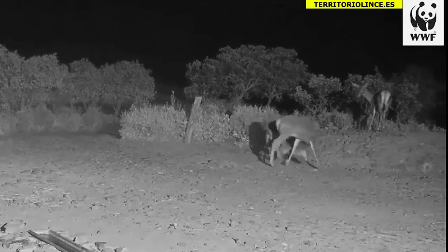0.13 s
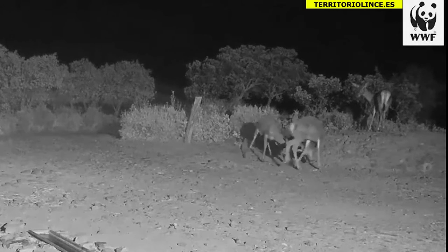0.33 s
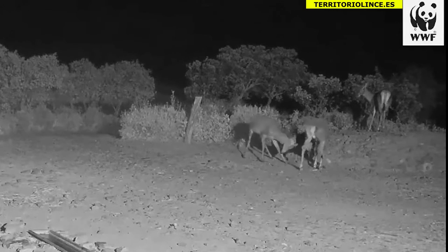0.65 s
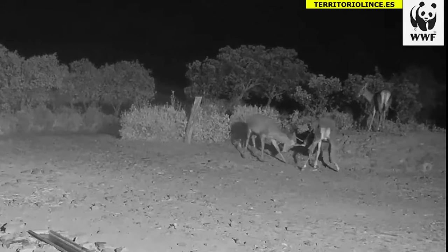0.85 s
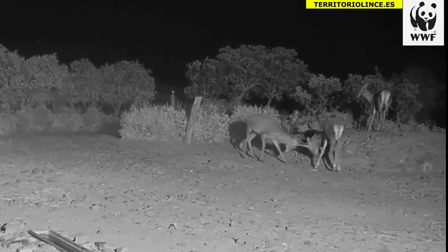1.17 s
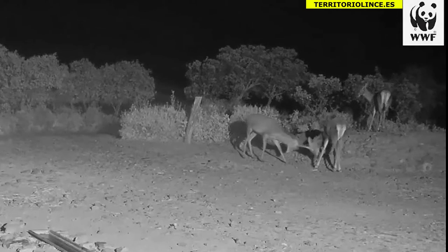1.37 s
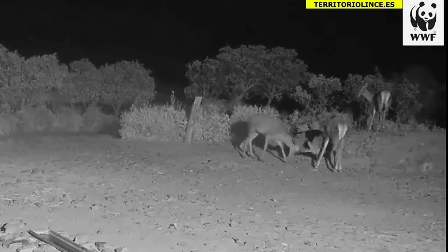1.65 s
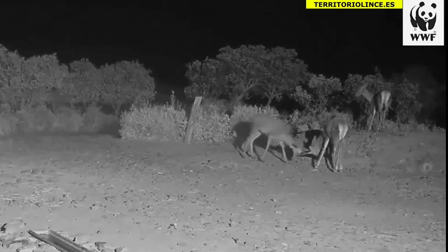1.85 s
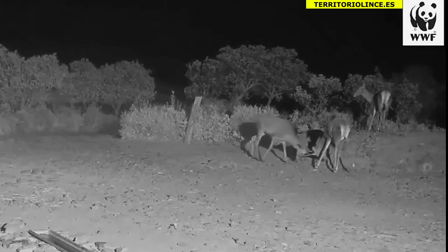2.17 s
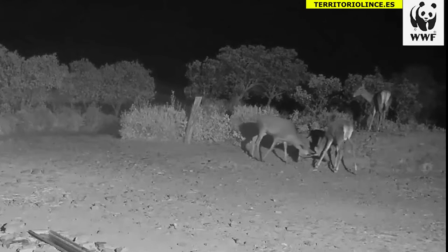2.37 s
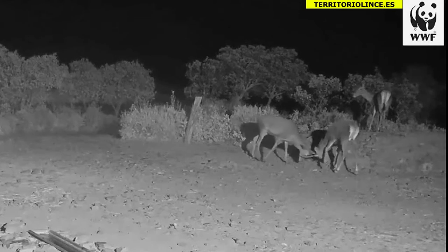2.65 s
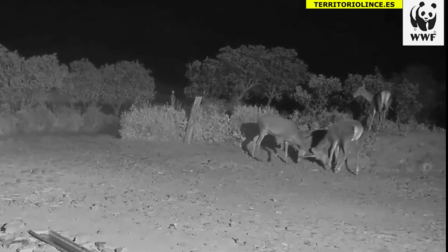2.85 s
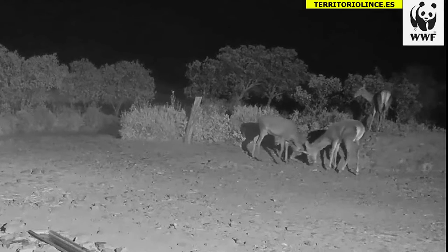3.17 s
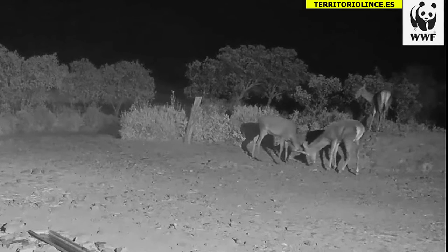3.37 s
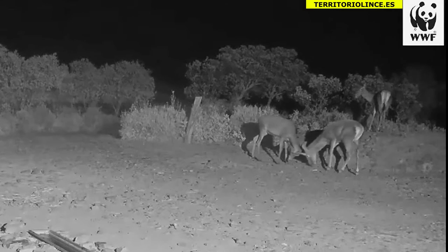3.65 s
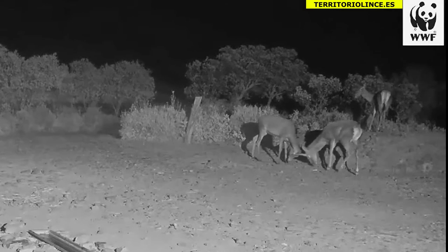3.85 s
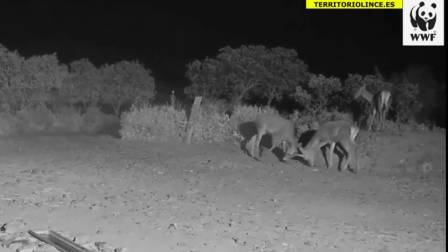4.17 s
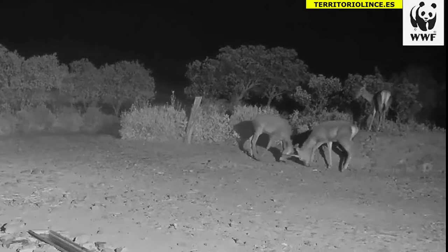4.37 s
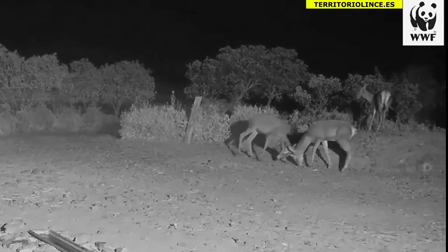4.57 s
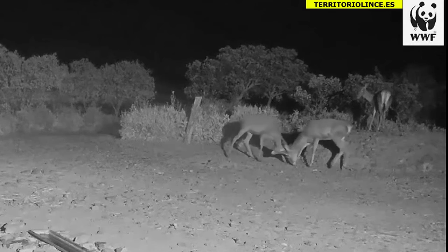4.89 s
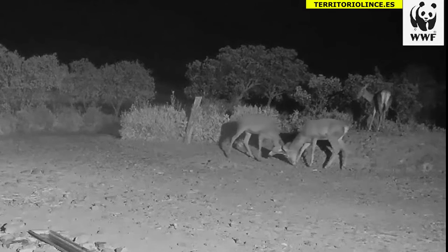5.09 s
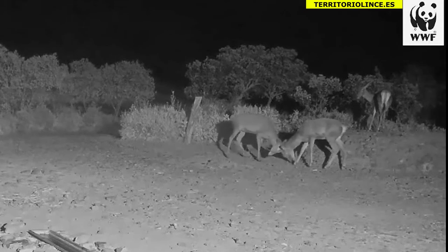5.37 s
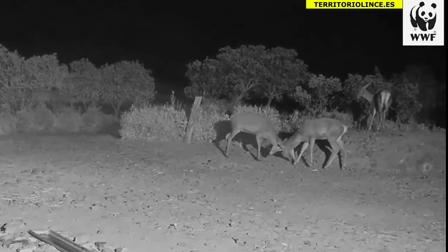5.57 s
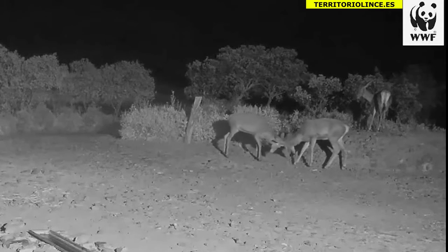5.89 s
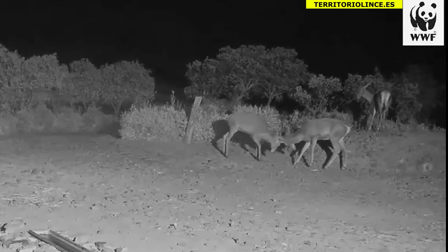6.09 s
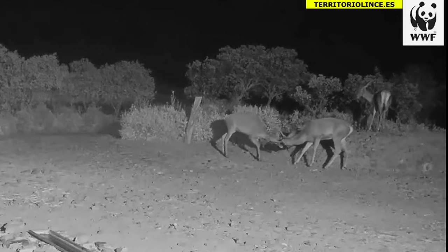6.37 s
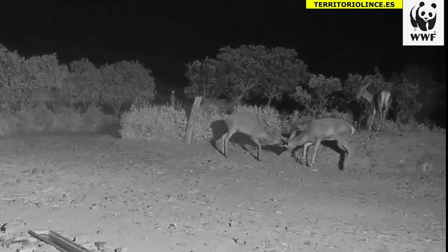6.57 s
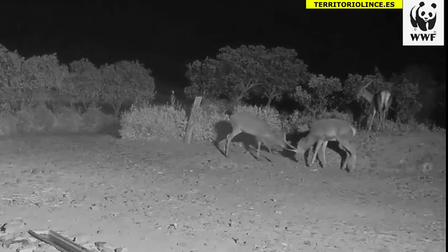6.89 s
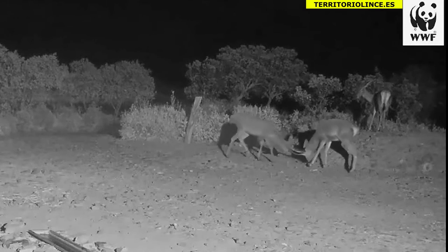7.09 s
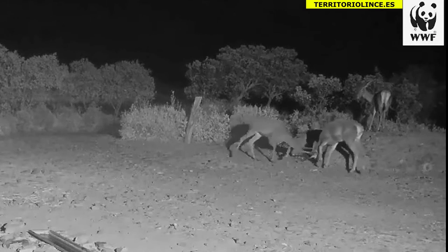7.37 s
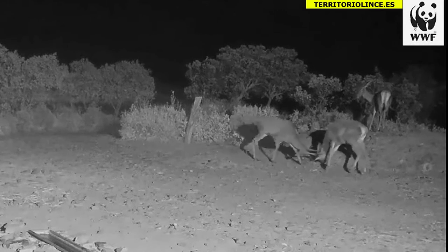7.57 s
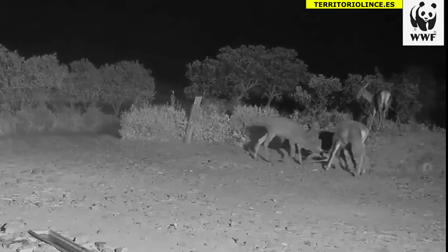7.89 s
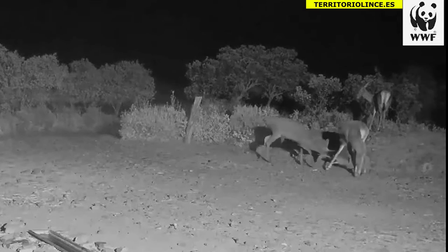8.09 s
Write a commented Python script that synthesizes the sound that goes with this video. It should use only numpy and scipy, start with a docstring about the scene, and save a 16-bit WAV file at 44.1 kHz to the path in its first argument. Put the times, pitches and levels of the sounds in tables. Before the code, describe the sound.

Two stags spar in an open clearing at night. A rapid flurry of dry antler clicks and short scrapes opens, then mostly hiss for a couple of seconds. Scattered clacks return with hoof thuds and dirt scuffles, building to one loudest sharp crack near seven seconds, then busy rattling and a faint low grunt. A small single microphone at some distance, mono, with steady noise and little bass.

```python
"""An open clearing at night: two stags lock antlers some way from a single small microphone.
Tines click (dry pulses plus ringing bone modes) and grate (dense contacts on the same modes).
Hooves thud (short low sine pulses) and scuffle (dense knocks on dirt modes).
One stag grunts (harmonics of a sagging pitch); steady coloured noise hisses over it all."""
import sys
import numpy as np
from scipy import signal
from scipy.fft import rfft, irfft
from scipy.io import wavfile

SR = 44100
rng = np.random.default_rng(int(sys.argv[2]) if len(sys.argv) > 2 else 0)


def generate_wav(sig):
    """Save sig (samples, or channels by samples) to the path in sys.argv[1] as 16-bit PCM at SR."""
    pcm = np.round(np.clip(np.atleast_2d(sig).T, -1, 1) * 32767).astype(np.int16)
    wavfile.write(sys.argv[1], SR, pcm)


N = 363384

# All source levels are ahead of the microphone filters.
# Tine-on-tine blows: (time [s], peak level [dB], centre [Hz], rise of the crack [cycles])
# A short rise is dry and broad.
BLOWS = [(.0794, -20, 2300, .5), (.0822, -20, 3700, .6), (.0865, -27, 2350, 1.0), (.3112, -18.5, 3900, .5),
         (.3131, -20, 4400, 1.2), (.3175, -18, 1450, .6), (.3255, -25, 2100, .5), (.3655, -15, 2100, .45),
         (.3693, -23, 2400, .5), (.5001, -15.5, 3300, .35), (.5029, -19, 3000, .7), (.5218, -18, 2900, .35),
         (.5231, -22, 3700, .6), (.529, -20, 3600, .5), (.5317, -20, 3250, 1.5), (.6048, -14.5, 2400, .45),
         (.688, -20, 3950, 1.8), (.689, -25, 1400, .6), (.6906, -25, 2000, .4), (.6933, -21, 1500, .4),
         (.9943, -21, 2500, .5), (.9955, -24, 4200, 1.0), (1.148, -29, 1300, .6), (3.046, -26, 1300, .7),
         (3.302, -29, 1250, .8), (4.0187, -22, 3500, .45), (4.0335, -25, 3500, .5), (4.0445, -19, 4000, .6),
         (4.0487, -22, 3900, .9), (4.0537, -15.5, 2300, .35), (4.1525, -23, 3000, .4),
         (4.181, -29, 2000, .6), (4.2185, -24, 4500, .4), (4.5457, -17, 3700, 1.0),
         (4.5477, -18.5, 3950, 1.1), (4.826, -28, 1000, .8), (4.834, -24, 1000, 1.5),
         (4.839, -23, 1150, .7), (4.8419, -23, 1100, .8), (4.995, -24, 4300, 1.5), (5.113, -30, 1090, .8),
         (5.146, -29, 1200, .8), (5.4295, -24, 1400, .35), (5.4398, -22, 1200, .4), (5.4435, -28, 5800, .8),
         (5.6448, -25, 3400, .5), (6.2907, -24, 4500, .4), (6.357, -30, 1090, .8), (6.383, -30, 1090, .8),
         (6.4026, -25, 3750, .7), (6.4071, -23, 4200, .4), (6.42, -18, 3500, 1.3), (6.4271, -16, 3200, 1.4),
         (6.4428, -24, 4500, .4), (6.4476, -25, 4050, .8), (6.4629, -22, 5200, 1.2),
         (6.465, -25, 3900, 1.5), (6.4713, -20, 5100, 1.0), (6.484, -27, 1400, .8), (6.4876, -24, 3300, .7),
         (6.51, -25, 3700, .5), (6.5236, -17, 4100, 1.3), (6.533, -18, 4300, 1.6), (6.824, -27, 6000, .6),
         (6.9465, -13, 4300, 1.1), (6.9477, -8.5, 5200, 1.2), (6.9497, -19, 3500, 1.2),
         (6.9519, -20, 5500, 1.0), (6.9528, -13.5, 4400, 1.0), (7.1444, -19, 4000, .4),
         (7.2871, -21.5, 3200, .5), (7.3305, -24, 2200, .4), (7.3374, -21, 3400, .4),
         (7.3385, -26, 1450, .8), (7.381, -28, 6500, .6), (7.417, -23, 6000, .4), (7.461, -22, 2000, .4),
         (7.7012, -23, 2700, .6), (7.7032, -20, 3400, .5), (7.7045, -23, 5000, .4), (7.7064, -24, 3300, .5),
         (7.893, -24, 3800, .9), (7.907, -25, 6500, .9), (7.9712, -24, 4300, .6), (7.9846, -20, 4700, 1.0),
         (7.9873, -20, 4800, 1.6), (7.9971, -21, 4600, .4), (7.9988, -22, 2200, .35),
         (8.0275, -25, 4500, .4), (8.0701, -19, 2800, .35), (8.0717, -18, 6600, .45),
         (8.1554, -20, 2200, .4), (8.1573, -20, 4700, .9), (8.1582, -23, 6800, .8), (8.159, -23, 1400, .6),
         (8.1611, -25, 2500, .4), (8.2144, -26, 4000, .5), (8.2159, -24, 4200, .5)]
# Antler bone modes: (frequency [Hz], relative level [dB], 60 dB decay [s])
ANTLER_MODES = [(1016, 6, 0.029), (1350, 1.5, 0.026), (1544, 1, 0.024), (2070, 8, 0.0046), (2350, 0, 0.01),
                (2800, -15, 0.0052), (3230, -1.5, 0.0079), (3870, 5, 0.008), (4200, 2, 0.007),
                (4780, 4, 0.008), (5400, 8, 0.0052), (6390, 7.5, 0.01), (6730, 5, 0.0094),
                (7600, 5, 0.0041)]
# Tines sliding on each other: (start [s], end [s], level [dB], centre of the ring [Hz])
GRATING_STROKES = [(.03, 0.138, -52, 3200), (0.3, 0.345, -36.5, 2300), (0.364, 0.4, -36, 2480),
                   (0.493, 0.514, -34.5, 3100), (0.505, 0.563, -33.5, 3450), (0.599, 0.64, -36, 2760),
                   (0.68, 0.71, -39, 2500), (0.985, 1.02, -40, 3500), (1.1, 1.2, -43, 1800),
                   (4.01, 4.07, -42, 4480), (4.82, 4.854, -38, 900), (5.08, 5.156, -44, 1000),
                   (5.43, 5.443, -50, 1400), (6.322, 6.464, -39.5, 2980), (6.444, 6.503, -38, 4200),
                   (6.49, 6.55, -37.5, 3470), (6.937, 6.982, -37, 3840), (7.094, 7.188, -41.5, 3500),
                   (7.322, 7.365, -38, 3000), (7.37, 7.425, -46, 6000), (7.875, 7.94, -41.5, 4500),
                   (7.942, 8.034, -34.5, 3000), (7.965, 8.006, -45, 4800), (8.04, 8.106, -43, 4000),
                   (8.145, 8.178, -35, 3530), (8.19, 8.24, -39, 5000)]
# Hooves striking dirt: (time [s], peak level [dB], pitch [Hz])
HOOF_THUDS = [(0.078, -33, 400), (0.088, -33, 380), (0.313, -31, 347), (0.462, -28, 483), (0.498, -27, 340),
              (0.689, -31, 450), (0.697, -27.5, 347), (0.704, -34, 400), (0.993, -27.5, 400),
              (1.003, -31, 350), (1.143, -31, 328), (3.052, -32, 280), (3.07, -32, 303), (4.514, -26, 270),
              (4.823, -19.5, 350), (4.8298, -24.5, 263), (4.842, -23.5, 416), (4.852, -28, 380),
              (4.862, -31, 250), (4.878, -27, 380), (4.983, -28, 361), (5.143, -31, 344),
              (5.4202, -29, 443), (5.428, -21.5, 265), (5.437, -21, 340), (5.443, -29, 454),
              (5.452, -37, 330), (6.314, -23.5, 312), (6.33, -31, 235), (6.343, -31, 330),
              (6.354, -22.5, 412), (6.366, -34, 302), (6.383, -20.5, 210), (6.4064, -25, 400),
              (6.413, -34, 330), (6.4255, -19, 420), (6.422, -22, 208), (6.4451, -26, 426),
              (6.4495, -22, 430), (6.467, -30, 453), (6.945, -23.5, 252), (6.952, -29, 298),
              (7.128, -31, 409), (7.14, -31, 400), (7.146, -25, 467), (7.155, -33, 432), (7.166, -32, 420),
              (7.216, -27.5, 440), (7.401, -29, 376), (7.701, -27.5, 393), (7.914, -29, 370),
              (7.972, -24.5, 430), (7.992, -32, 400), (8.019, -28, 241), (8.139, -29, 332),
              (8.15, -27, 328), (8.163, -26, 332), (8.174, -25, 327)]
# Hooves dragging: (start [s], end [s], level [dB])
HOOF_DRAGS = [(0.453, 0.535, -36), (0.53, 0.633, -41), (0.67, 0.748, -37.5), (1.1, 1.185, -42),
              (3.016, 3.13, -47), (4.51, 4.598, -39.5), (4.767, 4.82, -37.5), (4.81, 4.89, -35.5),
              (4.93, 5.046, -40), (5.055, 5.177, -37), (5.188, 5.255, -39), (5.387, 5.465, -38),
              (6.273, 6.54, -37.5), (6.34, 6.443, -38.5), (6.926, 6.98, -36.5), (7.1, 7.18, -36),
              (7.88, 8.013, -38), (7.963, 8.236, -40.5)]
# Modes of the dirt under the hooves: (frequency [Hz], relative level [dB], 60 dB decay [s])
DIRT_MODES = [(185.5, -3.5, 0.088), (257, -0.5, 0.056), (340, -4, 0.025), (458, 2, 0.013),
              (489, -2.5, 0.026), (1096, -8.5, 0.018)]
# Harmonics of the grunt: (multiple of the pitch [-], relative level [dB])
GRUNT_HARMONICS = [(2, 1), (3, -3), (4, -1.5), (5, -10)]
# Spectrum of the steady hiss: (frequency [Hz], relative level per Hz [dB])
HISS_SPECTRUM = [(25, -55), (60, -39), (100, -27), (135, -14), (180, -3), (420, -4), (560, -11),
                 (780, -20.5), (1050, -11.5), (1400, -9), (1950, -12.5), (3100, -7), (4500, -12),
                 (6400, -20), (7600, -24), (8500, -37.5)]

RING_DB, RING_SPREAD_DB = -19, 3  # ring re crack; scatter from mode to mode
CHATTER_GAP_S, CHATTER_DB = 0.0009, -13  # nominal gap; step per rebound
LIGHT_TOUCH_HZ = 2000  # rebounds drive modes below this less
FALL_BELOW_DB_PER_OCT, FALL_ABOVE_DB_PER_OCT = 12.5, 16  # modes away from the centre ring less
GRATE_PER_S, SCUFFLE_PER_S = 3500, 1600  # contacts, all modes together
# The grating ring is widest at one centre and narrows away from it (oct per oct).
GRATE_WIDEST_HZ, GRATE_WIDEST_OCT, GRATE_NARROWING = 3540, 0.98, 0.45
THUD_CYCLES, THUD_SWELL_CYCLES = 8.2, 0.29  # 60 dB decay; swell time constant
GRUNT_START_S, GRUNT_LENGTH_S, GRUNT_EDGE_S = 7.992, 0.181, 0.013
GRUNT_DB, GRUNT_SWELL_DB = -40, 1  # start level; rise by the end
GRUNT_HZ, GRUNT_FLOOR_HZ, GRUNT_SAG_S = 121.4, 89.7, 0.1  # start; limit; time constant
HISS_DB = -37
FLICKER_DB, FLICKER_PER_S = 0.6, 12
BASS_CUT_HZ = 165
HOUSING_DIP_HZ, HOUSING_DIP_Q, HOUSING_DIP_SHARE = 755, 1.7, 0.43
SOUND_BAND_HZ, CUTOFF_HZ = 7560, 13900
TOP_HISS_DB, TOP_HISS_HZ = -73, 9750  # rms ahead of the high-pass; its corner


def from_db(db):
    """Decibels to gain."""
    return 10 ** (np.asarray(db) / 20)


def rms_one(x):
    """Scale to unit rms."""
    return x / np.sqrt(np.mean(x ** 2) + 1e-20)


def ring(clicks, hz, t60_s):
    """Two-pole resonator: a unit click starts a decaying sine of height 1."""
    radius = from_db(-60 / (t60_s * SR))
    w = 2 * np.pi * hz / SR
    poles = [1, -2 * radius * np.cos(w), radius ** 2]
    return signal.lfilter([0, np.sin(w)], poles, clicks + 1e-18)  # offset avoids denormals


def grains(per_s, modes, spread_db):
    """Uneven random contacts, each dealt to one mode of the body; one row of rms 1 a mode."""
    size_db = spread_db * np.minimum(rng.exponential(1, N), 4)
    sizes = from_db(size_db) * rng.choice([-1, 1], N)
    contacts = sizes * (rng.random(N) < per_s / SR)
    dealt = rng.integers(0, len(modes), N)
    rows = []
    for k, (hz, _, t60_s) in enumerate(modes):
        rows.append(rms_one(ring(contacts * (dealt == k), hz, t60_s)))
    return np.array(rows)


def stroke(start_s, end_s):
    """Sample span of a stroke and its half-sine swell and fade."""
    a, b = round(start_s * SR), min(round(end_s * SR), N)
    return slice(a, b), np.sin(np.linspace(0, np.pi, b - a))


def cracks():
    """The contact itself: a dry pulse of about a cycle that peaks at the moment of the blow."""
    out, t = np.zeros(N + SR), np.arange(SR // 100) / SR
    for time_s, peak_db, hz, cycles in BLOWS:
        rise_s = cycles / hz
        shape = (t / rise_s * np.exp(1 - t / rise_s)) ** 2
        at = round((time_s - rise_s) * SR)
        out[at:at + len(t)] -= from_db(peak_db) * shape * np.cos(2 * np.pi * hz * (t - rise_s))
    return out[:N]


def clacks():
    """Each blow chatters through three quick contacts and rings most the modes near its centre."""
    time_s, blow_db, centre_hz, _ = np.transpose(BLOWS)
    contact = np.arange(3)
    scatter_db = RING_SPREAD_DB * rng.standard_normal((len(time_s), len(ANTLER_MODES), 3))
    lag_s = CHATTER_GAP_S * contact * rng.uniform(0.65, 1.1, (len(time_s), 3))
    at = np.round((time_s[:, None] + lag_s) * SR).astype(int)
    out = np.zeros(N)
    for k, (hz, mode_db, t60_s) in enumerate(ANTLER_MODES):
        above_oct = np.log2(hz / centre_hz)
        fall_db = np.maximum(FALL_ABOVE_DB_PER_OCT * above_oct, -FALL_BELOW_DB_PER_OCT * above_oct)
        level_db = blow_db + RING_DB + mode_db - fall_db
        rebound_db = CHATTER_DB + 40 * np.log10(min(hz / LIGHT_TOUCH_HZ, 1))
        click_db = level_db[:, None] + rebound_db * contact + scatter_db[:, k]
        clicks = np.zeros(N)
        np.add.at(clicks, at, (-1) ** k * from_db(click_db))  # sign alternates by mode
        out += ring(clicks, hz, t60_s)
    return out


def grating():
    """Sliding tines: dense contacts swell and fade, ringing the modes near the stroke's centre."""
    rings = grains(GRATE_PER_S, ANTLER_MODES, spread_db=2.2)
    mode_hz = np.array(ANTLER_MODES)[:, 0]
    out = np.zeros(N)
    for start_s, end_s, level_db, centre_hz in GRATING_STROKES:
        span, swell = stroke(start_s, end_s)
        off_oct = abs(np.log2(centre_hz / GRATE_WIDEST_HZ))
        width_oct = max(GRATE_WIDEST_OCT - GRATE_NARROWING * off_oct, 0.1)
        near = np.exp(-0.5 * (np.log2(mode_hz / centre_hz) / width_oct) ** 2)
        mix = near @ rings[:, span] / np.linalg.norm(near)
        out[span] += from_db(level_db) * swell * mix
    return out


def thuds():
    """A hoof gives a short low pulse that swells within a cycle and dies over a few more."""
    out, t = np.zeros(N + SR), np.arange(SR // 8) / SR
    for time_s, peak_db, hz in HOOF_THUDS:
        cycles = t * hz
        decay = 1000 ** (-cycles / THUD_CYCLES)  # a thousandfold fall is 60 dB
        shape = (1 - np.exp(-cycles / THUD_SWELL_CYCLES)) * decay
        at = round(time_s * SR)
        out[at:at + len(t)] += from_db(peak_db) * shape / shape.max() * np.sin(2 * np.pi * cycles)
    return out[:N]


def scuffle():
    """Hooves drag and push in the dirt: a dense low rumble of small knocks on the dirt modes."""
    knocks = grains(SCUFFLE_PER_S, DIRT_MODES, spread_db=1.6)
    rumble = rms_one(from_db(np.array(DIRT_MODES)[:, 1]) @ knocks)
    out = np.zeros(N)
    for start_s, end_s, level_db in HOOF_DRAGS:
        span, swell = stroke(start_s, end_s)
        out[span] += from_db(level_db) * swell * rumble[span]
    return out


def grunt():
    """Short low grunt of effort: harmonics of a sagging, shaky pitch; each wavers on its own."""
    t = np.arange(round(GRUNT_LENGTH_S * SR)) / SR
    knots_s = np.linspace(0, GRUNT_LENGTH_S, 12)
    shake = 1 + 0.0076 * np.interp(t, knots_s, rng.standard_normal(len(knots_s)))
    pitch_hz = GRUNT_FLOOR_HZ + (GRUNT_HZ - GRUNT_FLOOR_HZ) * np.exp(-t / GRUNT_SAG_S)
    phase = 2 * np.pi * np.cumsum(pitch_hz * shake) / SR
    envelope = np.clip(np.minimum(t, GRUNT_LENGTH_S - t) / GRUNT_EDGE_S, 0, 1)
    swell_db = GRUNT_DB + GRUNT_SWELL_DB * t / GRUNT_LENGTH_S
    out, at = np.zeros(N + SR), round(GRUNT_START_S * SR)
    for multiple, harmonic_db in GRUNT_HARMONICS:
        waver_db = 2.5 * np.interp(t, knots_s, rng.standard_normal(len(knots_s)))
        gain = envelope * from_db(swell_db + harmonic_db + waver_db)
        out[at:at + len(t)] += gain * np.cos(multiple * phase)
    return out[:N]


def hiss():
    """Broad noise in the colour of the microphone housing; its level flickers slightly."""
    hz = np.maximum(np.arange(N // 2 + 1) * SR / N, 1)
    table_hz, table_db = np.transpose(HISS_SPECTRUM)
    colour = from_db(np.interp(np.log(hz), np.log(table_hz), table_db))
    noise = rms_one(irfft(rfft(rng.standard_normal(N)) * colour, N))
    knots = rng.standard_normal(100)
    flicker = np.interp(np.arange(N) / SR * FLICKER_PER_S, np.arange(len(knots)), knots)
    return from_db(HISS_DB + FLICKER_DB * flicker) * noise


def scene():
    """One microphone with a bass cut on the stags: both channels carry the same sound."""
    stags = cracks() + clacks() + grating() + thuds() + scuffle() + grunt()
    bass_cut = signal.butter(5, BASS_CUT_HZ, "high", fs=SR, output="sos")
    stags = signal.sosfilt(bass_cut, stags)
    # the microphone housing swallows part of a low-mid band
    notched = signal.lfilter(*signal.iirnotch(HOUSING_DIP_HZ, HOUSING_DIP_Q, fs=SR), stags)
    stags = stags + HOUSING_DIP_SHARE * (notched - stags)
    return np.tile(stags + hiss(), (2, 1))


def record(dry):
    """Steep zero-delay band limit, as in a converter; faint electronic hiss above; top cut."""
    band_limit = signal.butter(5, SOUND_BAND_HZ, fs=SR, output="sos")
    band = signal.sosfiltfilt(band_limit, dry)
    high_pass = signal.butter(10, TOP_HISS_HZ, "high", fs=SR, output="sos")
    top_hiss = from_db(TOP_HISS_DB) * signal.sosfilt(high_pass, rng.standard_normal(N))
    top_cut = signal.ellip(12, 0.5, 60, CUTOFF_HZ, fs=SR, output="sos")
    return signal.sosfilt(top_cut, band + top_hiss)


dry = scene()
out = record(dry)
generate_wav(out)
```